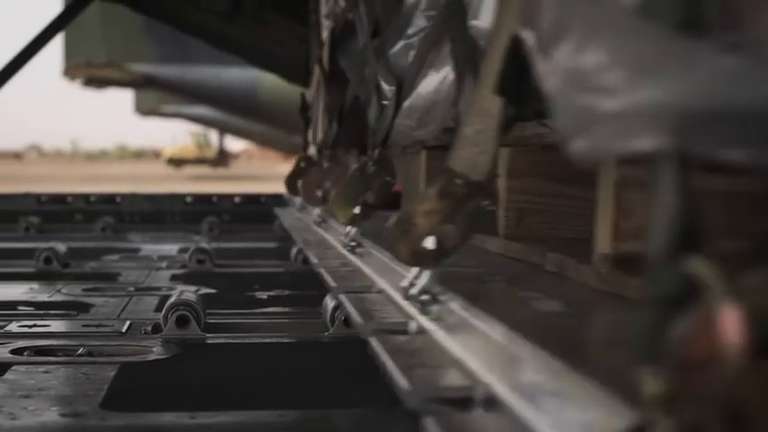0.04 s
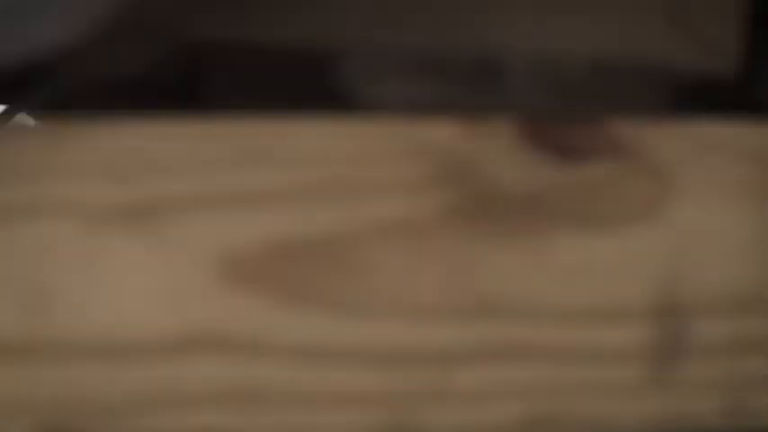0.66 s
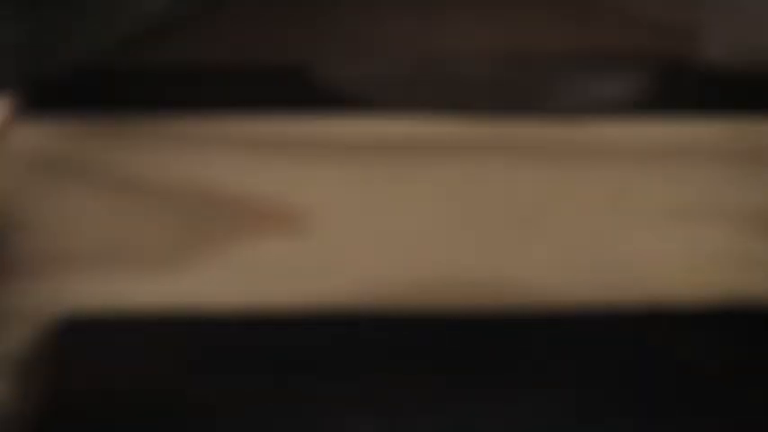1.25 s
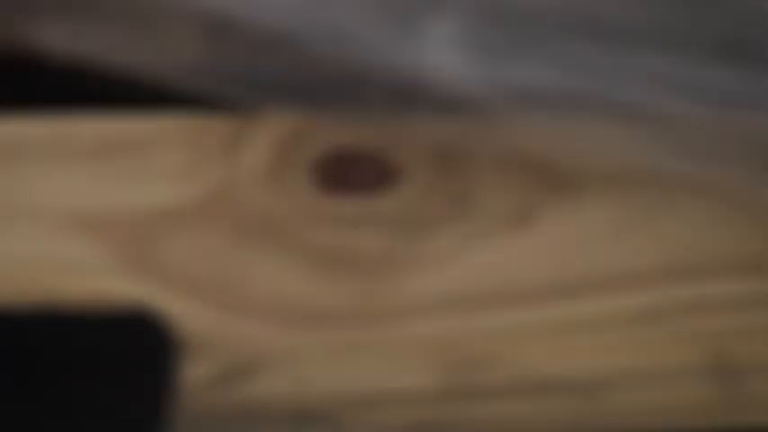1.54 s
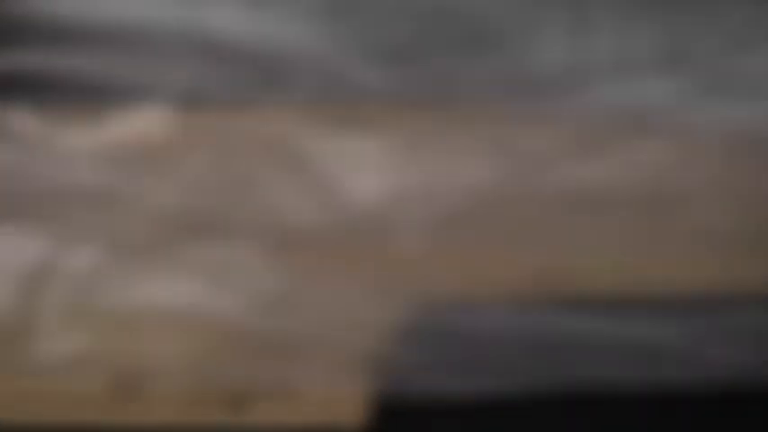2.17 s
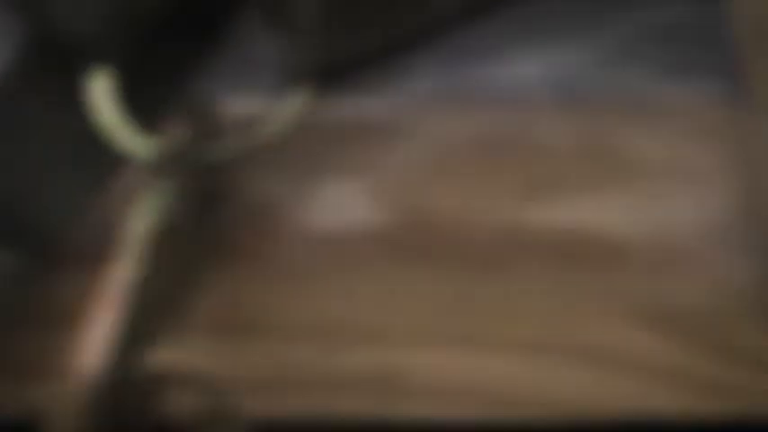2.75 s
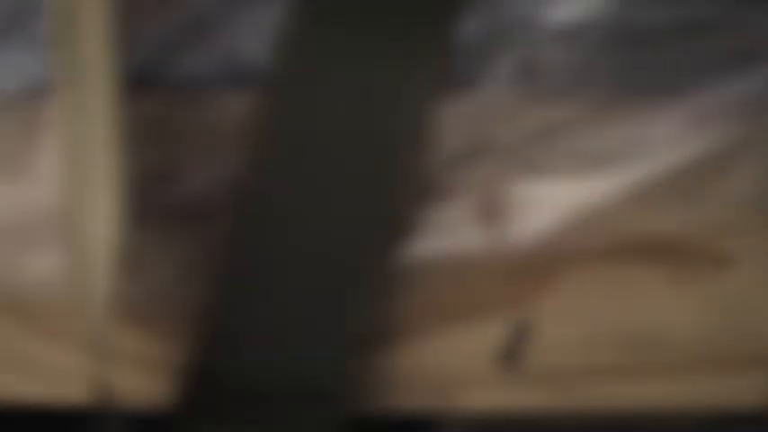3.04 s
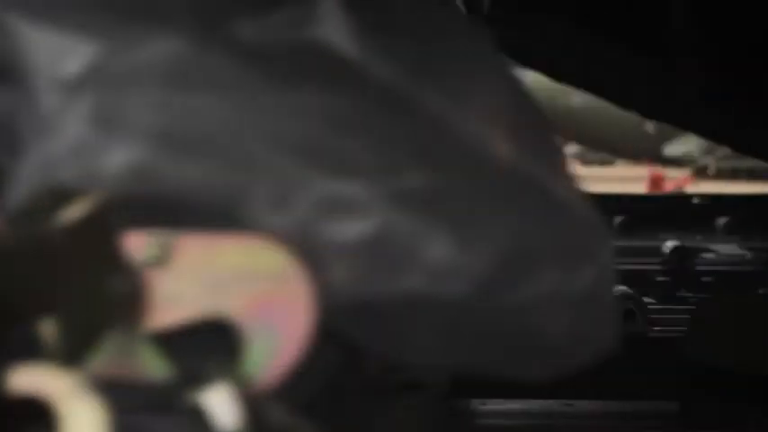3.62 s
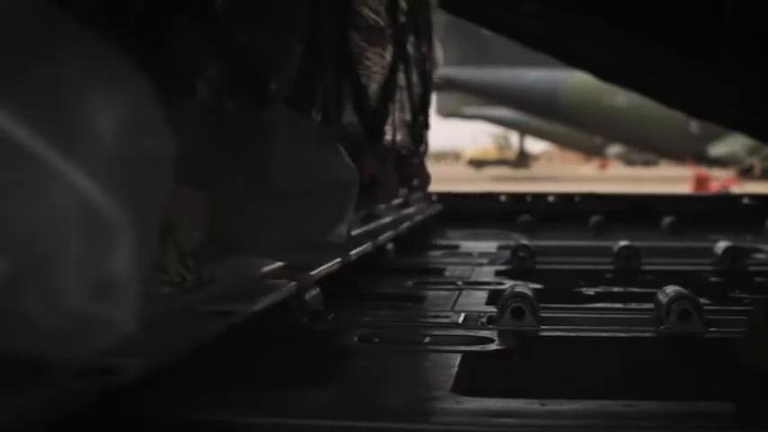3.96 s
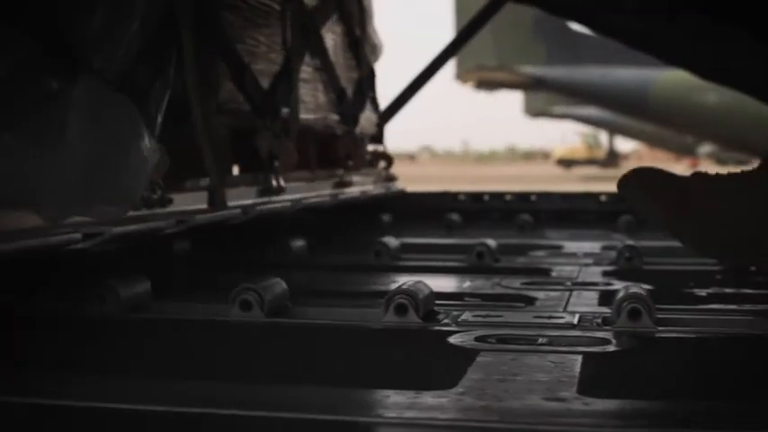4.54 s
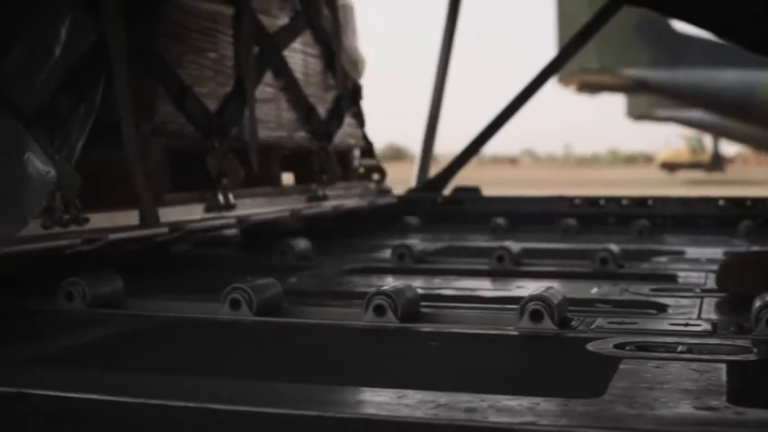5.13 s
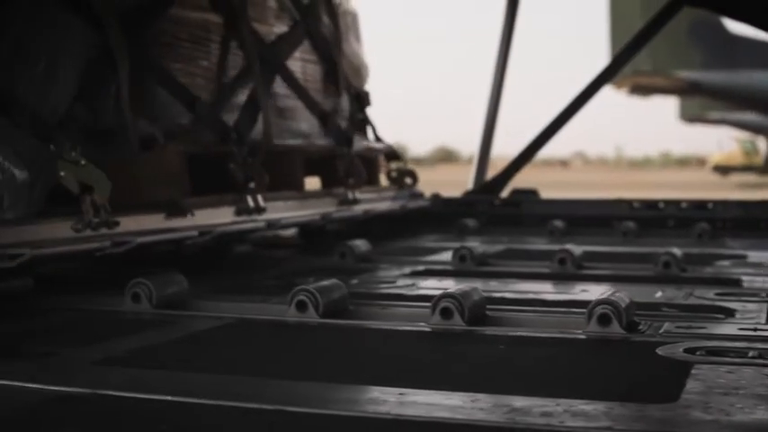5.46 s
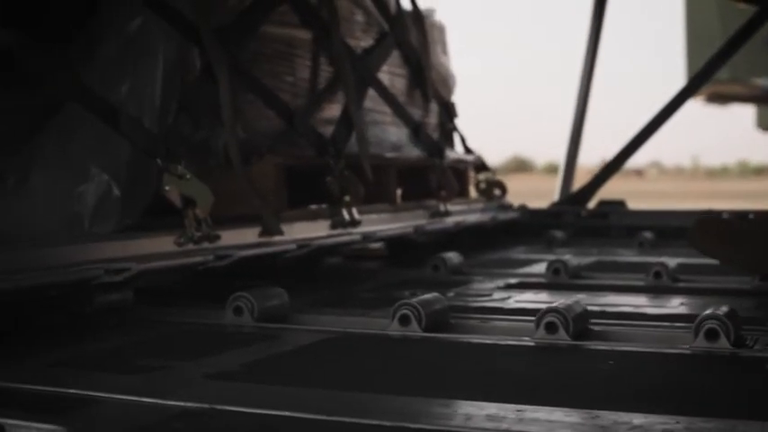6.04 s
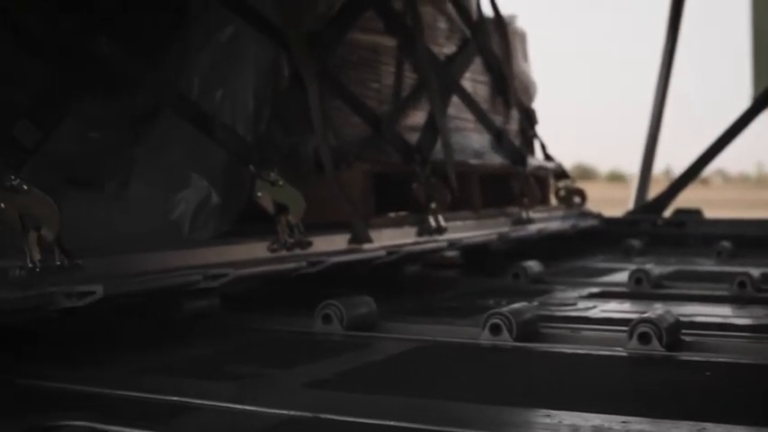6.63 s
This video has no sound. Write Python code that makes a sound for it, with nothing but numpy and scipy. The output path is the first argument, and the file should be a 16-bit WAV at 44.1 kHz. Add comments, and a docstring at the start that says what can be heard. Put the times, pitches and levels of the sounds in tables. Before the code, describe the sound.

Heard from near the floor of an aircraft hold, a heavy pallet thumps and clatters across steel rollers that grind and squeak. The knocks weaken as it slows. Then come sharp metal clicks and two booming impacts, less than a second apart, as it locks against the side rail. The ringing fades briefly, leaving soft rushing air and the thin whine of fans and a turbine.

```python
"""In the cargo hold of an aircraft, a loaded pallet is pushed past over floor rollers.
Fans and a turbine whine quietly behind it. The pallet rumbles along and knocks twice on each roller,
and slipping rollers chirp. Then it trips the steel rail locks and bangs twice into its place.
Most sounds are shaped noise that swells and fades; struck parts also ring with dying tones."""
import sys
import numpy as np
from scipy import signal
from scipy.fft import rfft, irfft, next_fast_len
from scipy.io import wavfile
from scipy.ndimage import uniform_filter1d

SR = 44100
rng = np.random.default_rng(int(sys.argv[2]) if len(sys.argv) > 2 else 0)


def store_wav(level_fs):
    """Save 16-bit WAV to argv[1]."""
    pcm = np.round(np.clip(np.atleast_2d(level_fs), -1, 1) * 32767)
    wavfile.write(sys.argv[1], SR, pcm.T.astype(np.int16))


N = 303849
TIME = np.arange(N) / SR
BINS_HZ = np.maximum(np.fft.rfftfreq(next_fast_len(N), 1 / SR), 1)

# A spectrum says how strong each pitch is. A mode is a pitch at which a part likes to ring.
# A ring time is how long a sound takes to fade by 60 dB.

# how alike the left and right sides are (1 = the same): f/Hz, likeness
STEREO_LIKENESS = [(60, 1), (180, 0.89), (310, 0.8), (540, 0.27), (930, -0.25), (1600, -0.024),
                   (5000, 0.0056)]
# how much louder the left side is than the right: f/Hz, level/dB
STEREO_BALANCE = [(60, -1.0), (600, -0.6), (1100, 1.5), (2200, 3.0), (3600, 2), (6000, -1.5)]

# noise spectrum of each part: f/Hz, relative level/dB
AIR_SPECTRUM = [(20, -3), (80, -3), (120, -1.5), (170, -4.5), (400, -10), (600, -13.5), (1000, -8),
                (1900, -9), (2800, -17), (3200, -18.5), (3900, -20), (4400, -18.5), (6500, -36.5),
                (8800, -58)]   # rushing ventilation
FLOOR_SPECTRUM = [(20, -11.5), (42, 3), (75, 2), (110, 2), (150, -8.5), (230, -16), (500, -76)]   # the deep-sounding floor
BEARING_SPECTRUM = [(80, -8.5), (250, 4), (450, -1.5), (750, -3.5), (1200, -15.5), (2500, -18.5),
                    (5000, -29), (7000, -49.5), (8800, -69.5)]   # grinding roller bearings
STEEL_SPECTRUM = [(300, -4), (800, 12.5), (1600, 3), (2800, -0.5), (3900, -5), (5500, -8), (7000, -15.5),
                  (8600, -33)]   # roller shells and lock catches
LOAD_KNOCK_SPECTRUM = [(60, -29.5), (130, -1.5), (220, 3), (330, 1), (480, -1), (690, -0.5), (950, -13),
                       (1600, -32), (4000, -89)]   # the load, knocked by a roller
DECK_SPECTRUM = [(250, -29.5), (600, -12.5), (950, 4), (1350, -3.5), (1900, -9.5), (2800, -10.5),
                 (3800, -20), (5200, -25), (6800, -34.5), (8500, -53)]   # the aluminium deck
LOAD_CRASH_SPECTRUM = [(35, -14), (70, -1.5), (140, 0), (220, -1.5), (340, -0.5), (480, -3), (720, -6.5),
                       (1100, -10.5), (1700, -19), (2600, -26.5), (5000, -72)]   # the whole load, jolted at a stop
RAIL_SPECTRUM = [(300, -10), (700, 0.5), (1100, -0.5), (1800, -10.5), (2700, -7.5), (3400, -15),
                 (5200, -22), (7000, -32.5), (8600, -49.5)]   # the side rail

# fan hums and whines: f/Hz, width/Hz, relative level/dB
FAN_WHINES = [(70.6, 5.4, -53), (120, 10, -54), (297.3, 8.4, -63.5), (456, 9.9, -60), (2390, 7.3, -63.5),
              (3207, 190, -55), (4260, 39, -60.5), (6440, 120, -78.5)]
# tones of the fan blades: f/Hz, level/dB
BLADE_TONES = [(3268, -61), (4252, -69.5)]
# the turbine between swells: base tone level/dB, octave level/dB
TURBINE_IDLE = [-68, -59]
# the turbine swells and fades: t/s, half length/s, base tone level/dB, octave level/dB
SWELLS = [(3.95, 0.66, -54, -60), (5.64, 0.16, -55.5, -52.5), (6.48, 0.19, -70, -51.5)]

# modes of a roller's shell: f/Hz, width/Hz, relative level/dB
SHELL_MODES = [(3606, 13, -1.5), (3700, 85, 2.5), (4497, 24, -9.5), (5670, 14, -9.5), (5860, 32, -22),
               (6570, 34, -20), (8000, 60, -29.5)]
# modes of the struck parts: f/Hz, relative level/dB, ring time/s
SMALL_STEEL_MODES = [(2740, -1.5, 0.19), (5300, -11, 0.13), (5590, -2.5, .2), (6930, -25, .12)]
PALLET_FRAME_MODES = [(56.5, -23, .8), (86.5, 0.5, 0.21), (129.2, -4, .25), (173, -16, 0.18),
                      (237, -12, 0.22), (272.7, -5, .25), (323.6, 3, 0.067), (391.7, -5, 0.21),
                      (498, -14.5, 0.74), (699, -3.5, 0.13), (774, -16, .25), (934, -8, 0.17)]
SIDE_RAIL_MODES = [(1276, -11.5, .6), (1380, -17, .45), (1970, -5, 0.44), (2563, -15, .9), (2540, -8, 1),
                   (2744, -6.5, .6), (2937, -3.5, 0.52), (3650, -10.5, 0.39)]

# the rolling noise follows the pallet's speed and nearness: t/s, level/dB
ROLLING_LEVELS = [(0.0, -33), (0.15, -42), (0.55, -30.5), (1.02, -38), (1.25, -31.5), (2.13, -35.5),
                  (2.28, -33.5), (2.92, -39), (3.32, -35), (3.87, -45), (4.49, -47.5), (4.62, -38.5),
                  (5.51, -42), (5.82, -48), (6.39, -54.5), (6.89, -54.5)]
# a roller slips: t/s, squeal level/dB, length/s
ROLLER_SLIPS = [(0.011, -42.5, 0.06), (0.149, -35, 0.03), (0.42, -29.5, .035), (0.574, -44, 0.034),
                (0.615, -39, .03), (1.123, -45, .014), (1.392, -46, 0.023), (2.48, -49, .008),
                (2.756, -51, .008), (3.059, -40.5, 0.013), (3.128, -41, 0.014), (3.322, -39, .009),
                (3.383, -46.5, 0.028), (3.598, -45, 0.0043), (3.672, -44, .004)]
# a bright steel snap (hard roller knocks crack early on, lock catches click later): t/s, level/dB
STEEL_SNAPS = [(0.082, -25.5), (1.003, -37), (4.437, -26.5), (4.491, -32), (4.628, -34), (4.681, -31.5),
               (4.73, -33), (5, -36), (5.315, -36)]
# a floor panel gives under the weight with a dull thump: t/s, level/dB
PANEL_THUMPS = [(0.039, -16), (0.488, -16), (2.702, -29)]
# the pallet rides onto a roller, rocks and touches again:
# t/s, level/dB, second touch against the first/dB, hardness of the first touch/dB
ROLLER_KNOCKS = [(0.082, -14, -5, 2), (0.351, -16, -7, 0.5), (0.562, -20.5, -15, 0),
                 (0.739, -17.5, -9, 2.5), (1.01, -15, -9.5, 0), (1.155, -24.5, -3, -13),
                 (1.283, -18, -6.5, -0.5), (1.535, -22, -23, -3), (1.631, -16.5, -4, -0.5),
                 (1.791, -23.5, -1, -3.5), (2.016, -20.5, -6.5, -3.5), (2.16, -25.5, -12, -2.5),
                 (2.225, -19, -7.5, -3.5), (2.421, -24, -1, -6), (2.674, -26, -1.5, -6),
                 (3.053, -22, 3, -7.5), (3.316, -21.5, 3, -16), (3.579, -24, -7.5, -1),
                 (4.884, -36, 2.5, 1)]
# the pallet grazes the rail and rams a stop:
# t/s, head start of the graze/s, boom level/dB, crash level/dB, clang level/dB, loss per jolt/dB
STOP_HITS = [(4.565, .008, -14, -14.5, -36.5, 13), (5.31, .018, -19, -13.5, -26, 4)]


def from_db(db):
    """Turn decibels into a factor to multiply a sound by."""
    return 10 ** (np.asarray(db) / 20)


def unit_power(x):
    """Scale a signal so that its average power is 1."""
    return x / np.sqrt(np.mean(x ** 2) + 1e-20)


def over_hz(points):
    """Join a few (frequency, value) points into a curve over all frequencies."""
    hz, value = np.transpose(points)
    return np.interp(np.log(BINS_HZ), np.log(hz), value)


def drift(rate):
    """A random wobble of about 1 that heads for a new value `rate` times a second."""
    targets = rng.standard_normal(int(N / SR * rate) + 2)
    return unit_power(np.interp(TIME * rate, np.arange(len(targets)), targets))


def stereo_noise(gain):
    """Steady left and right noise, shaped by one gain for each frequency."""
    size = next_fast_len(N)
    shared, opposed = rfft(rng.standard_normal((2, size)))
    alike = np.clip(over_hz(STEREO_LIKENESS), -.99, .99)
    sides = np.array([[1], [-1]])
    pair = np.sqrt(1 + alike) * shared + np.sqrt(1 - alike) * opposed * sides
    balance = from_db(sides * over_hz(STEREO_BALANCE) / 2)
    return unit_power(irfft(pair * gain * balance, size)[:, :N])


def smooth_noise(spectrum):
    """Noise with a smooth spectrum, like a part whose many modes blur together."""
    return stereo_noise(from_db(over_hz(spectrum)))


def peaky_noise(spectrum, spacing_hz, ripple_db):
    """Noise with random peaks in its spectrum, like metal whose many modes stand out."""
    peaks = rng.standard_normal(SR // 10)
    ripple = np.interp(BINS_HZ / spacing_hz, np.arange(len(peaks)), peaks)
    return stereo_noise(from_db(over_hz(spectrum) + ripple_db * ripple))


def singing_noise(modes):
    """Noise squeezed into a few narrow bands, so that it has clear pitches."""
    power = sum(from_db(db) ** 2 / width / (1 + ((BINS_HZ - hz) / width) ** 2) ** 2
                for hz, width, db in modes)
    return stereo_noise(np.sqrt(power))


def steadied(x, samples):
    """Even out the loudness of noise, so that each event alone sets its strength."""
    power = uniform_filter1d(uniform_filter1d(np.mean(x ** 2, axis=0), samples), samples)
    return x / np.sqrt(np.abs(power) + 1e-12)


def tone(hz, db, sway_rad=0.85, flutter_db=2.0):
    """A tone that wavers as it reaches each side by its own shifting paths."""
    phase = 2 * np.pi * np.cumsum(hz * np.ones(N)) / SR
    pair = [from_db(db + flutter_db * drift(20)) * np.sin(phase + sway_rad * drift(11)) for _ in range(2)]
    return np.sqrt(2) * np.array(pair)


def blows(times, levels_db, ring_s, rise_s, echo_db, echo_s=0.93):
    """Loudness curve of a struck part: each blow builds up, dies away and echoes in the hold."""
    age = TIME[:SR]
    direct = from_db(-60 * age / ring_s)
    echo = from_db(echo_db - 60 * age / echo_s)
    one_blow = (1 - np.exp(-age / rise_s)) ** 2 * (direct ** 2 + echo ** 2)
    power = np.zeros(N + SR)
    for s, db in zip(times, levels_db):
        start = max(int(s * SR), 0)
        power[start:start + SR] += from_db(db) ** 2 * one_blow
    return np.sqrt(power[:N])


def ringing(times, levels_db, modes, scatter_db):
    """Each blow starts a dying tone in every mode, with a random strength and sign."""
    sound, age = np.zeros((2, N + 2 * SR)), TIME[:2 * SR]
    for hz, mode_db, ring_s in modes:
        alike = np.clip(np.interp(hz, *np.transpose(STEREO_LIKENESS)), -1, 1)
        phase_gap = np.arccos(alike) * rng.choice([-1, 1])   # high modes reach the two sides out of step
        phase = 2 * np.pi * hz * age + phase_gap * np.array([[.5], [-.5]])
        ring = from_db(-60 * age / ring_s) * np.sin(phase)
        for s, db, (chance, flip) in zip(times, levels_db, rng.standard_normal((len(times), 2))):
            start = max(int(s * SR), 0)
            strength = np.sign(flip) * from_db(db + mode_db + scatter_db * chance)
            sound[:, start:start + len(age)] += strength * ring
    return sound[:, :N]


def ventilation(air_db=-45.5, whine_db=-48.0):
    """Air rushes steadily while the fans hum and whine."""
    return from_db(air_db) * smooth_noise(AIR_SPECTRUM) + from_db(whine_db) * singing_noise(FAN_WHINES)


def turbine(base_hz=807, wander_hz=1.5):
    """A turbine sings a tone and the octave above it; both swell and fade."""
    pitch_hz = base_hz + wander_hz * drift(25)
    power = from_db(TURBINE_IDLE)[:, None] ** 2
    for s, half_s, *peaks_db in SWELLS:
        swell = np.exp(-((TIME - s) / half_s) ** 2)
        power = power + np.outer(from_db(peaks_db) ** 2, swell)
    base_db, octave_db = 10 * np.log10(power)
    return tone(pitch_hz, base_db) + tone(2 * pitch_hz, octave_db)


def fan_blades(swell_db=4.0):
    """Spinning blades make thin, high tones that slowly grow louder and softer."""
    return sum(tone(hz, db + swell_db * drift(2.5)) for hz, db in BLADE_TONES)


def rolling(lull_s=0.07, lull_db=1.5, lumpy_db=0.46, grit_db=1.5, scuff_db=-16.0, scuff_swing_db=4.0):
    """The pallet's uneven underside drums on the floor, grinds the bearings and scuffs the rollers."""
    # the sound eases while the pallet's edge spans the gap before each roller
    lulls = sum(np.exp(-((TIME - s + lull_s / 2) / lull_s) ** 2) for s, *_ in ROLLER_KNOCKS)
    level_db = np.interp(TIME, *np.transpose(ROLLING_LEVELS)) - lull_db * lulls + lumpy_db * drift(35)
    rumble = smooth_noise(FLOOR_SPECTRUM) * from_db(level_db)
    scuffs = peaky_noise(STEEL_SPECTRUM, spacing_hz=70.25, ripple_db=4.5)
    scuffs *= from_db(level_db + scuff_db + scuff_swing_db * drift(18))
    grinding = smooth_noise(BEARING_SPECTRUM) * from_db(level_db + grit_db * drift(300))
    return rumble + scuffs + grinding


def roller_chirps(usual_db=-45.5, scrape_db=-39, rise_s=0.0022, fade_s=0.022, rough_db=2.5):
    """A slipping roller's shell squeals over a dry scrape, then rings out."""
    scrape, squeal = np.zeros((2, N))
    age = TIME[:SR // 4]
    for s, db, length_s in ROLLER_SLIPS:
        start = int(s * SR)
        span = slice(start, start + len(age))
        slip = (1 - np.exp(-age / rise_s)) * np.exp(-np.maximum(age - length_s, 0) / fade_s)
        scrape[span] += from_db(scrape_db + 0.31 * (db - usual_db)) * slip   # grows less than the squeal
        squeal[span] += from_db(db - 0.5) * slip
    shell = steadied(singing_noise(SHELL_MODES), samples=400)
    grit = peaky_noise(STEEL_SPECTRUM, spacing_hz=69.0, ripple_db=4.0)
    roughness = from_db(rough_db * drift(250))   # the contact sticks and slips unevenly
    return (squeal * shell + scrape * grit) * roughness


def steel_snaps(ring_db=-15.0, rattle_db=2.0, low_cut_hz=900):
    """Struck steel snaps brightly and rings: hard roller knocks early on, lock catches later."""
    s, db = np.transpose(STEEL_SNAPS)
    snaps = blows(s, db + 0.5, ring_s=0.24, rise_s=0.0019, echo_db=-13)
    steel = peaky_noise(STEEL_SPECTRUM, spacing_hz=71.2, ripple_db=3.0)
    low_cut = signal.butter(1, low_cut_hz, "high", fs=SR, output="sos")   # small parts do not ring low
    rattle = signal.sosfilt(low_cut, steel) * snaps * from_db(rattle_db * drift(460))
    return rattle + ringing(s, db + ring_db, SMALL_STEEL_MODES, scatter_db=1.0)


def touches(rock_s=0.066):
    """The pallet meets each roller, rocks and touches again: t/s, level/dB, hardness/dB."""
    for s, db, second_db, hardness_db in ROLLER_KNOCKS:
        yield s, db, hardness_db
        yield s + rock_s, db + second_db, 0


def roller_knocks(usual_db=-21.5, load_db=-2.0, frame_db=-11.0, chatter_db=0.5):
    """Each touch shakes the floor, load, deck and frame; the contact chatters as it settles."""
    s, db, hardness_db = np.transpose(list(touches()))
    force_db = db - usual_db
    thud_db = -25 + 0.45 * force_db - 0.25 * hardness_db   # a soft touch goes more into the floor
    clang_db = -30 + 1.01 * force_db + hardness_db   # a harder knock is brighter
    crack_db = -36 + 2.7 * force_db + hardness_db   # only the hardest knocks crack
    thuds = blows(s, thud_db, ring_s=0.296, rise_s=0.0056, echo_db=-24.5)
    clangs = blows(s, clang_db, ring_s=0.304, rise_s=0.0017, echo_db=-14.5)
    cracks = blows(s, crack_db, ring_s=0.093, rise_s=0.0008, echo_db=-30.5)
    thumps = blows(*np.transpose(PANEL_THUMPS), ring_s=0.2, rise_s=0.0037, echo_db=-25)
    chatter = from_db(chatter_db * drift(260))
    floor = steadied(smooth_noise(FLOOR_SPECTRUM), samples=900) * np.hypot(thuds, thumps)
    load = steadied(peaky_noise(LOAD_KNOCK_SPECTRUM, spacing_hz=27.35, ripple_db=2.0), samples=500)
    load *= blows(s, db + load_db, ring_s=0.26, rise_s=0.0035, echo_db=-19)
    deck = steadied(peaky_noise(DECK_SPECTRUM, spacing_hz=45.18, ripple_db=2.0), samples=300)
    deck *= np.hypot(clangs, cracks)
    # a small roller sets only the frame's higher modes ringing
    high_modes = [mode for mode in PALLET_FRAME_MODES if mode[0] > 200]
    frame = ringing(s, db + frame_db, high_modes, scatter_db=4.0)
    return floor + frame + (load + deck) * chatter


def jolts(graze_db=-21.5, flex_db=-13.5, later_boom_db=-5.5, gap_s=0.031, count=4):
    """The small steps that make up each bang: t/s, boom level/dB, crash level/dB, clang level/dB."""
    for s, ahead_s, boom, crash, clang, loss in STOP_HITS:
        yield s - ahead_s, boom + graze_db, crash + graze_db, clang   # the pallet grazes the rail
        # its frame starts to flex against the stop
        yield s - 0.55 * ahead_s, boom + flex_db, crash + 2 * flex_db, clang + 2 * flex_db
        for k in range(count):   # the full blow, then ever weaker jolts of the load against its nets
            drop = k * loss
            yield s + k * gap_s, boom - drop + later_boom_db * (k > 0), crash - drop, clang - drop / 2


def stop_bangs(shudder_db=-15.5, ring_db=-9.0, chatter_db=1.0, contact_hz=900):
    """Tonnes of load halt at once: the frame booms, cargo crashes, the rail rings, the floor shudders."""
    s, boom_db, crash_db, clang_db = np.transpose(list(jolts()))
    soft_contact = signal.butter(2, contact_hz, fs=SR, output="sos")   # a broad, soft hit dulls the boom
    frame = signal.sosfilt(soft_contact, ringing(s, boom_db, PALLET_FRAME_MODES, scatter_db=4.0))
    cargo = steadied(smooth_noise(LOAD_CRASH_SPECTRUM), samples=400)
    cargo *= blows(s, crash_db, ring_s=0.46, rise_s=0.0055, echo_db=-18)
    rail = steadied(smooth_noise(RAIL_SPECTRUM), samples=300)
    rail *= blows(s, clang_db, ring_s=0.49, rise_s=0.0029, echo_db=-2.5)
    floor = steadied(smooth_noise(FLOOR_SPECTRUM), samples=900)
    floor *= blows(s, boom_db + shudder_db, ring_s=1, rise_s=0.006, echo_db=-21)
    chatter = from_db(chatter_db * drift(220))
    rail_ring = ringing(s, clang_db + ring_db, SIDE_RAIL_MODES, scatter_db=2.0)
    return floor + frame + (cargo + rail) * chatter + rail_ring


def scene():
    """The moving pallet over the steady sound of the aircraft."""
    pallet = roller_knocks() + rolling() + roller_chirps() + steel_snaps() + stop_bangs()
    return pallet + ventilation() + turbine() + fan_blades()


def record(dry):
    """Cut the deepest bass, below 20 Hz, and the highest treble, above 8950 Hz."""
    bass_cut = signal.butter(2, 20, "high", fs=SR, output="sos")
    treble_cut = signal.ellip(10, .2, 80, 8950, fs=SR, output="sos")
    return signal.sosfilt(treble_cut, signal.sosfilt(bass_cut, dry))


dry = scene()
out = record(dry)
store_wav(out)
```